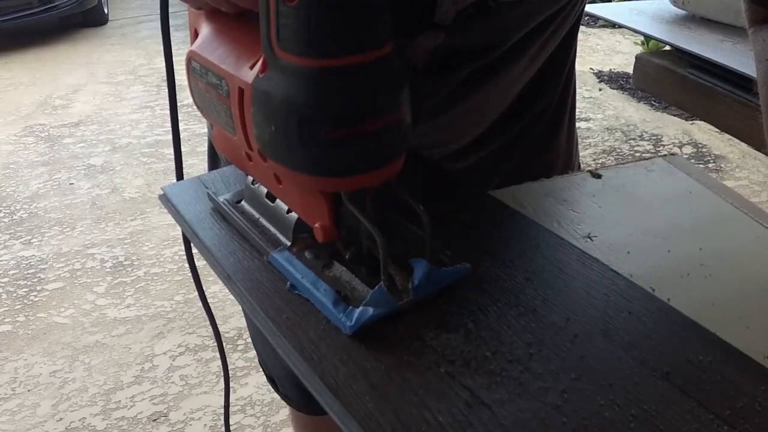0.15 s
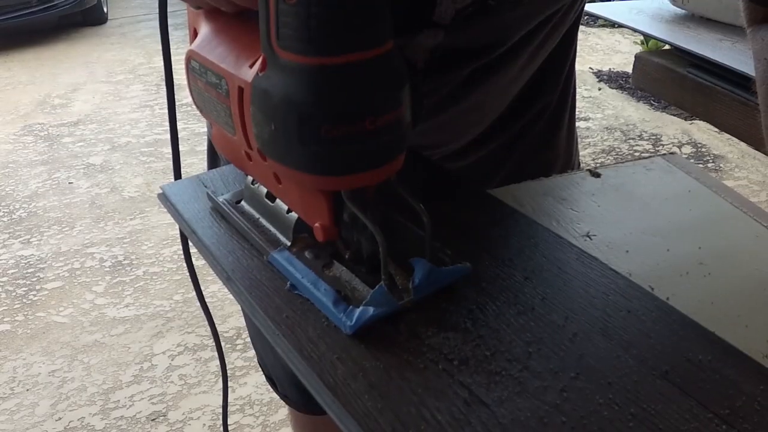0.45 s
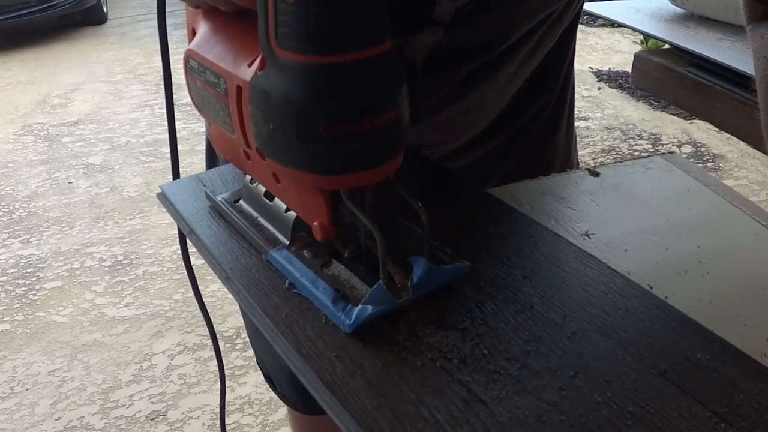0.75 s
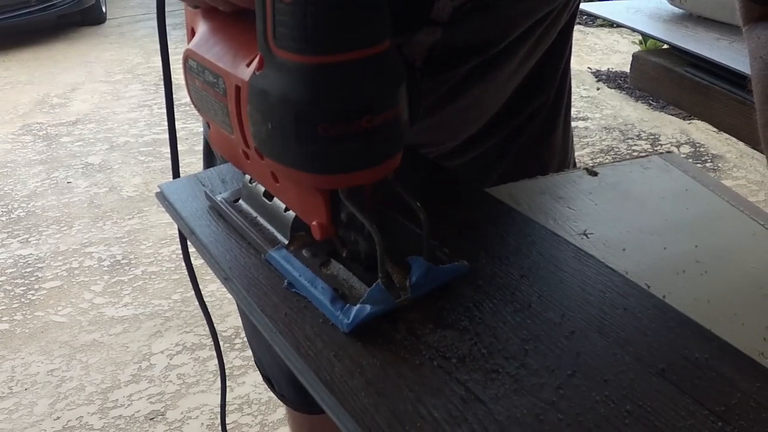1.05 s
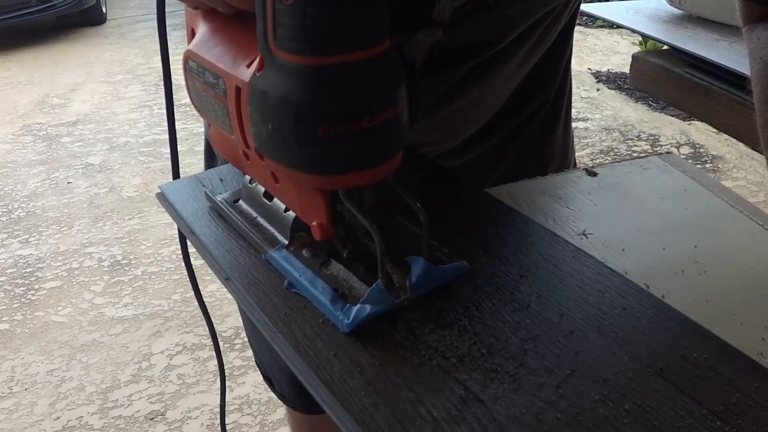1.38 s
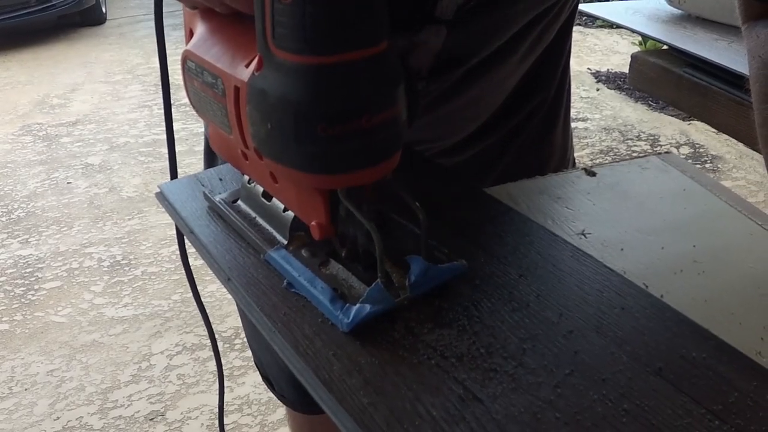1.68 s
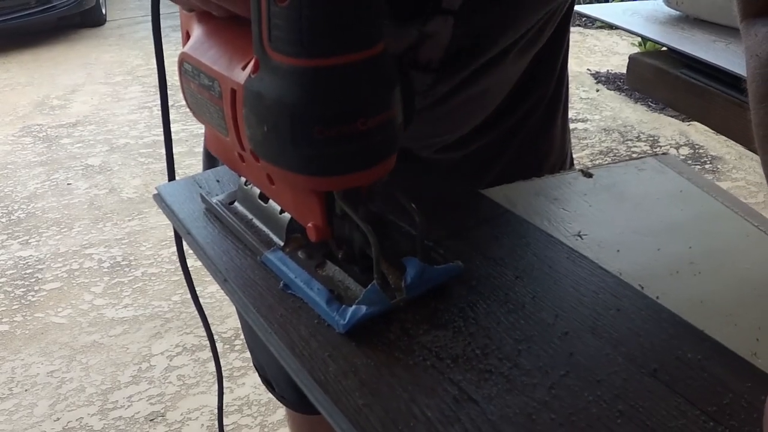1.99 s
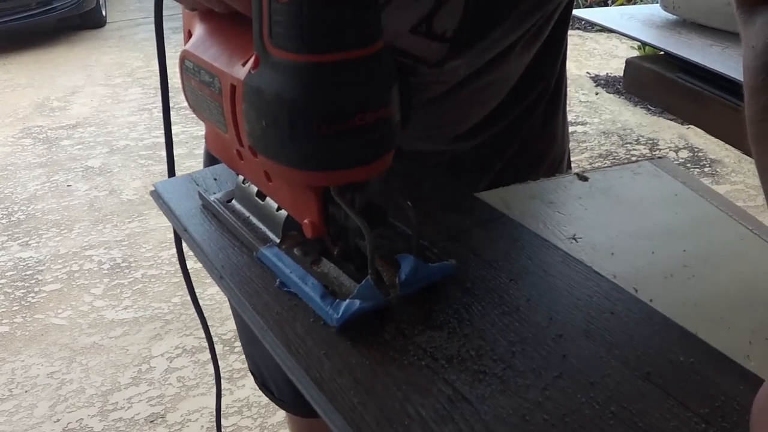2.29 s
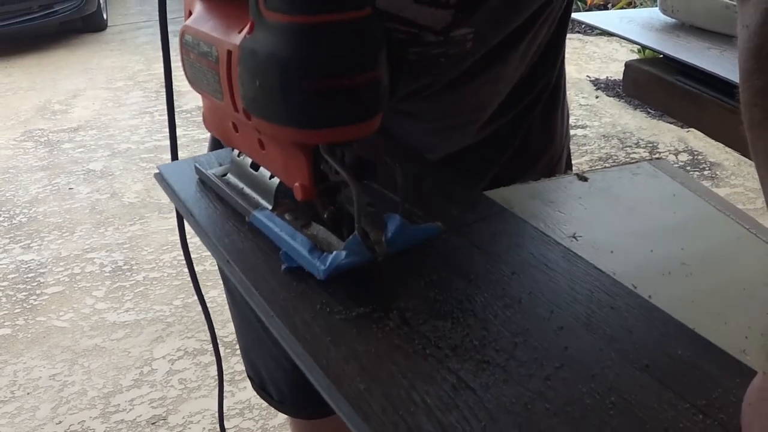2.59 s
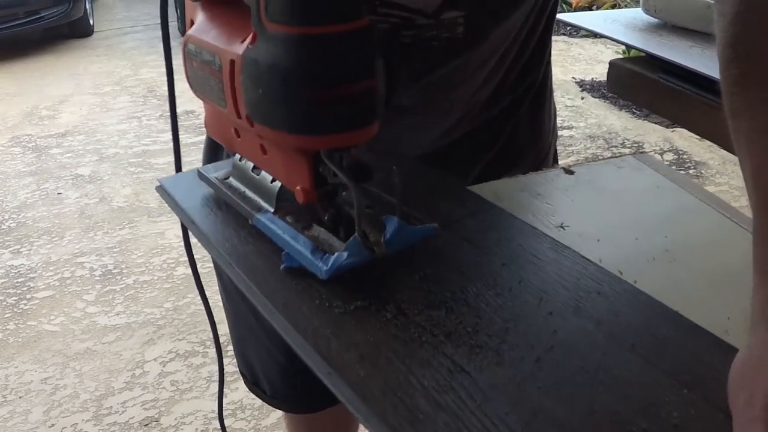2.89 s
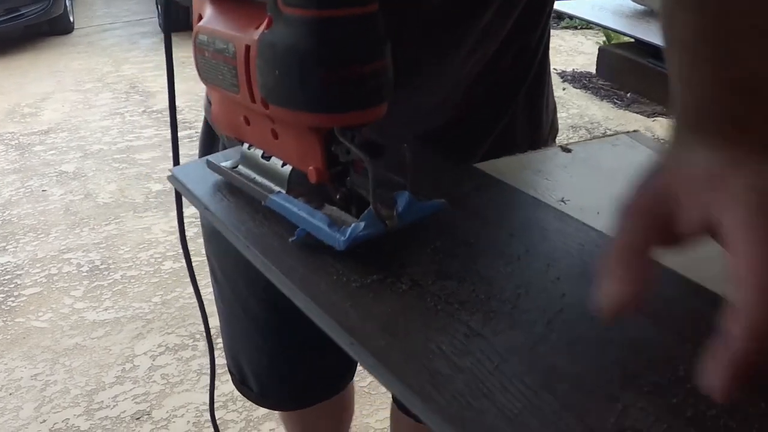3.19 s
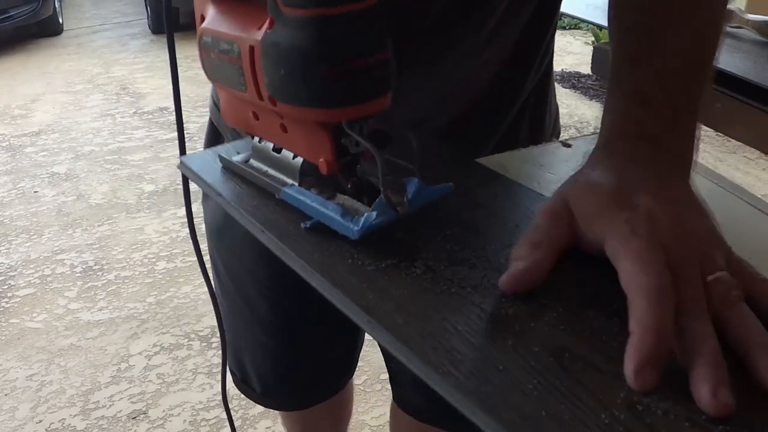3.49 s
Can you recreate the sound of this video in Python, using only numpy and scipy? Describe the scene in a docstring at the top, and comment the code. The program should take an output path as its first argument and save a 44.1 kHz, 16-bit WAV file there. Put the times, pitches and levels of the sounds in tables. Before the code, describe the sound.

Jigsaw buzzing and rattling in a plank slows to rest, with a bump and metallic clink.

```python
"""Jigsaw cutting a vinyl plank

A corded jigsaw rattles through a plank at the mouth of a garage, is switched off and coasts to rest.
One crank speed times the stroke knocks, the gear teeth and the swell of the blade's rasp.
Filtered noise and short noise bursts make the rattle, scrape and bumps; sines make the whine and hums.
The saw bumps the plank, clinks as it is lifted clear, and a hand comes down on the plank."""
import sys
import numpy as np
from scipy import signal
from scipy.fft import rfft, irfft, next_fast_len
from scipy.io import wavfile
from scipy.ndimage import uniform_filter1d, map_coordinates

SR = 44100
rng = np.random.default_rng(int(sys.argv[2]) if len(sys.argv) > 2 else 0)


def transcribe(signal):
    """Save signal, clipped to [-1, 1], as a 16-bit WAV file at the path in sys.argv[1]."""
    frames = np.atleast_2d(signal).T
    limited = np.clip(frames, -1, 1)
    pcm = np.round(limited * 32767).astype(np.int16)
    wavfile.write(sys.argv[1], SR, pcm)


N = 160965  # length in samples

# All dB values are relative levels; names ending in _T60 are seconds to fade by 60 dB.
# A turn is one full stroke of the crank. A swing in dB is the rise (or dip, if negative) in each stroke.

# Low wide rush, probably wind. Each row: time in seconds, level in dB.
BREEZE_LEVEL = [(0, -37), (.15, -38.5), (.45, -49), (.65, -56.5), (.8, -83), (.9, -130)]
# Its tone colour. Each row: frequency in Hz, level in dB.
BREEZE_COLOUR = [(20, -10.5), (60, -10.5), (110, -6), (200, 1), (320, 3), (460, -1.5), (600, -23),
                 (800, -63.5)]
# Deep rumble at the start. Each row: time in seconds, level in dB.
RUMBLE_LEVEL = [(0, -42.5), (.17, -51.5), (.27, -75), (.5, -91)]
# Its tone colour. Each row: frequency in Hz, level in dB.
RUMBLE_COLOUR = [(15, -5.5), (30, -4), (70, -0.5), (200, -27), (1000, -70)]
BREEZE_MID_DB = -1
# Colour of the steady background air. Each row: frequency in Hz, level in dB.
AIR_COLOUR = [(20, -18), (45, -15), (68, -1), (90, -4), (130, -6.5), (200, -8.5), (450, -11), (900, -14),
              (1500, -21), (2200, -27), (4000, -30), (5000, -38.5), (7000, -31.5), (15000, -35)]
AIR_DB = -60.5
# How long the garage rings. Each row: frequency in Hz, time to fade by 60 dB in seconds.
GARAGE_DECAY = [(100, 0.1), (1000, 0.37), (4500, 0.21), (12000, 0.67)]
GARAGE_DB = -10
TOP_HZ = 15200

# Taps of the saw's shoe on the plank. Each row: start in seconds, click level in dB,
# upper edge of the click in Hz, thump level in dB, sway level in dB.
TAPS = [(2.701, -23, 2620, -25, -54), (2.723, -41, 2000, -55, -37), (2.766, -39, 3000, -36.5, -43),
        (3.000, -48, 900, -46, -39.5), (3.014, -33.5, 2100, -41.5, -46), (3.043, -50, 3000, -55, -35.5),
        (3.175, -56, 4000, -68, -75), (3.2522, -47.5, 4000, -59.5, -65), (3.319, -63.5, 4000, -48, -67.5),
        (3.39, -60, 6000, -66, -71)]
CLICK_T60 = 0.054
THUMP_HZ, THUMP_T60, SWAY_HZ, SWAY_T60 = 259.5, 0.084, 86.3, 0.14
# Clinks of steel shoe and blade on lifting. Each row: start in seconds, level in dB.
CLINKS = [(3.023, -43), (3.031, -29), (3.034, -20.5), (3.0394, -27), (3.049, -35.5)]
# Tone colour of the steel. Each row: frequency in Hz, level in dB.
STEEL_COLOUR = [(300, -23), (1400, -11.5), (2300, -11.5), (3100, -9), (4000, -6), (4750, 1), (5600, -13.5),
                (7500, -22), (8800, -40), (10200, -23.5), (14000, -39.5)]
# Ringing of the steel. Each row: frequency in Hz, level in dB, time to fade by 60 dB in seconds.
STEEL_MODES = [(1530, 1, 0.13), (2970, -4, 0.14), (3530, -17, .18), (4270, -8, 0.27), (4570, -6, .16),
               (4786, -6, .22), (5000, -7, .13), (5400, -8, 0.18)]
CLINK_T60, CLINK_RING_DB, SPLASH_T60, SPLASH_DB = .02, -22, .13, -17.5
SHIMMER_DB, SHIMMER_HZ, SHIMMER_WIDTH_HZ, SHIMMER_T60 = -14, 4450, 330, 0.16
# Ringing under the hand. Each row: frequency in Hz, level in dB, time to fade by 60 dB in seconds.
PAT_MODES = [(440, 0, 0.12), (600, -2.5, .22), (690, 2.5, 0.074), (820, -5.5, 0.094)]
PAT_S, PAT_DB, PAT_SLAP_DB = 3.602, -42.5, -14  # start in seconds, levels
BURST_ATTACK_S, RING_ATTACK_S = 0.00063, 0.0014

# Shaking of the plank. Each row: time in seconds, level in dB.
SHAKE_LEVEL = [(0, -42), (.35, -38.5), (.75, -43), (1.5, -45), (2.15, -47), (2.4, -50.5), (2.7, -65),
               (2.83, -79.5)]
# Tone colour of the plank. Each row: frequency in Hz, level in dB.
PLANK_COLOUR = [(25, -34), (60, -17.5), (140, -5.5), (190, -14.5), (300, -7.5), (550, -2), (760, -5),
                (950, -4), (1600, -24.5), (5000, -58.5)]
# Resonances of the plank. Each row: frequency in Hz, width in Hz, lift in dB.
PLANK_MODES = [(132, 27, 3.8), (239.3, 24, 15.1), (323.8, 43, 13), (490.7, 24, 11.2), (766, 55, 4.8)]
SHAKE_SWING_DB, SHAKE_TURN, SHAKE_NOISE_DB = 6, .06, -0.5
THUD_TURN, THUD_DB = -0.0307, -2.5
# Bark of the plank while the teeth still bite deep. Each row: time in seconds, level in dB.
BITE_LEVEL = [(0, -35), (.3, -35.5), (.55, -38), (.75, -43.5), (1.6, -44), (2.2, -74.5)]
BITE_HZ, BITE_WIDTH_HZ, BITE_TURN, BITE_SWING_DB = 760, 225, 0.051, 5

# Short tones: low hums at first, then the falling gear tone and its overtone as the saw slows.
# Each row: start in seconds, end in seconds, pitch in Hz, level in dB.
SHORT_TONES = [(.06, .215, 322, -34), (.26, .33, 324, -38), (.44, .56, 326, -38), (.548, .578, 1070, -29),
               (.66, .708, 239, -34.5), (1.625, 1.69, 718, -38), (1.785, 1.835, 600, -38),
               (1.86, 1.9, 545, -42), (1.945, 1.998, 500, -33), (2.015, 2.068, 480, -35.5),
               (2.137, 2.18, 790, -33.5), (2.3, 2.502, 241.8, -52)]
TONE_WANDER = 0.45  # radians of phase

# Pings of the blade against its guide. Each row: start in seconds, level in dB, pitch in Hz.
PINGS = [(1.784, -29, 11200), (1.788, -42, 13850), (2.035, -25.5, 10860), (2.267, -33, 10900),
         (2.594, -55, 10370)]
PING_T60, PING_WIDTH_HZ = 0.052, 630
# Ticks of the blade in its guide, every stroke. Each row: seconds from the turning point, level in dB.
GUIDE_TICKS = [(-.007, -35.5), (.0055, -39), (.019, -37.5)]
GUIDE_HZ, GUIDE_WIDTH_HZ, GUIDE_T60, TICK_SCATTER_DB = 10900, 1100, .04, 1.8
# Snags of the teeth in the plank. Each row: start in seconds, level in dB.
SNAGS = [(.134, -14.5), (.553, -16.5), (.836, -20), (1.003, -18), (1.1135, -16), (1.286, -17.5),
         (1.523, -20), (1.646, -17.5), (1.784, -18), (1.861, -16), (1.944, -21.5), (2.056, -17.5),
         (2.143, -18.5), (2.169, -23.5), (2.269, -20.5), (2.276, -24.5), (2.434, -21.5)]
SNAG_T60, SNAG_LOW_HZ = .055, 900  # snags are thinned below this frequency

# Dry scrape of the coasting gears. Each row: time in seconds, level in dB.
COAST_LEVEL = [(1.5, -54), (1.9, -32.5), (2.15, -32), (2.3, -33), (2.45, -36), (2.53, -35.5), (2.68, -44.5),
               (2.76, -54), (2.82, -81.5)]
# Tone colour of the gears. Each row: frequency in Hz, level in dB.
GEARS_COLOUR = [(250, -39.5), (550, -21), (800, 0.5), (1050, -15.5), (1400, 3), (2200, 2), (3100, 2.5),
                (4500, -4), (5200, -5.5), (7400, -22), (8200, -44.5), (15000, -38)]
SCRAPE_PER_S, SCRAPE_SCATTER_DB, SCRAPE_FLUTTER_DB = 5000, 3, 1.5  # grains a second, unevenness
# Clicks of the slack as the drive runs down. Each row: start in seconds, level in dB.
SLACK_CLICKS = [(2.301, -25.5), (2.336, -22.5), (2.377, -25.5), (2.475, -30), (2.523, -36), (2.549, -29.5),
                (2.556, -30), (2.594, -32), (2.643, -37.5), (2.674, -31.5), (2.749, -46)]
SLACK_T60 = .035

# Gear whine. Each row: time in seconds, level in dB.
WHINE_LEVEL = [(0, -27.5), (.25, -26.5), (.7, -28), (1.1, -27), (1.5, -29), (1.72, -36), (1.8, -38.5),
               (1.87, -41), (1.96, -37), (2.05, -39), (2.15, -42.5), (2.7, -68)]
# Swell of the whine through one stroke. Each row: position in turns, level in dB.
WHINE_BEAD = [(-.4, -20), (-.25, -11), (-.16, -18), (-.05, 0), (.08, -1), (.22, -4), (.36, -17)]
WHINE_WANDER, WHINE_FLUTTER_DB = .6, 1.5  # radians of phase, unevenness
SPEED_RIPPLE, RIPPLE_TURN = 0.023, 0.067  # share by which whine pitch sways each stroke, and its place
GEAR_TEETH = 46

# Crank speed. Each row: time in seconds, strokes per second.
SPEED = [(0.0, 19.23), (0.6, 18.07), (1.1, 17.81), (1.55, 16.7), (1.85, 12.71), (2.2, 7.99), (2.5, 4.91),
         (2.8, 0.0)]
START_TURN = -.551
# Vigour of the mechanism. Each row: time in seconds, level in dB.
DRIVE_LEVEL = [(0, -1.8), (.45, -1.67), (1.1, -2.5), (1.65, -1.94), (1.9, -4), (2.15, -7), (2.35, -10.5),
               (2.55, -22), (2.7, -21), (2.76, -39), (2.82, -67)]
# Knocks of the slack drive, every stroke. Each row: seconds from the turning point, level in dB.
KNOCKS = [(-.0075, 0), (-.0035, -3.5), (.0055, -3), (0.0106, -7), (.024, -8)]
KNOCK_DB, KNOCK_T60, KNOCK_SCATTER_DB, KNOCK_JITTER_S = -28, 0.059, 1, .0009
KNOCK_SOFTEN_DB = 1  # lost per halving of the speed, below half the top speed
RATTLE_DB, RATTLE_SWING_DB, RATTLE_PER_S, RATTLE_SCATTER_DB = -30.5, 7.5, 1400, 4
TEETH_DB, TOOTH_JITTER, TOOTH_SCATTER_DB = -31, .17, 4  # jitter is in tooth spacings
RASP_DB, RASP_SWING_DB = -29.5, -6
LOAD_TURN, LOAD_WIDTH = 0.017, 0.28  # centre and spread of the loaded part of the stroke, in turns
# Tone colour of the saw's case. Each row: frequency in Hz, level in dB.
CASE_COLOUR = [(100, -47), (400, -13.5), (600, -2.5), (1050, -8.5), (1500, -3.5), (2200, 1), (2700, -1),
               (3600, -1.5), (4550, -3), (5100, -5.5), (6300, -10), (7500, -18), (8800, -27),
               (10800, -18.5), (12500, -35.5), (15000, -52)]
# Resonances of the case. Each row: frequency in Hz, width in Hz, lift in dB.
CASE_MODES = [(842, 78, -1.5), (1228, 35, 6), (1438, 190, 4), (1700, 60, 1.5), (1932, 39, 5.5),
              (2110, 220, 2.5), (2262, 160, 4.5), (2345, 59, -2.5), (2863, 100, 3), (3190, 70, -1),
              (3278, 140, 5.5), (3950, 200, 4.5), (4286, 280, 4.5), (4590, 80, 6.5)]
# Tone colour of the rasping blade. Each row: frequency in Hz, level in dB.
BLADE_COLOUR = [(200, -29.5), (700, -6), (2000, -5), (4300, 5), (5200, -2.5), (7400, -11.5), (8600, -21.5),
                (10900, -13.5), (12500, -39), (15000, -64)]


def amp(db):
    """Turn decibels into a gain."""
    return 10 ** (np.asarray(db) / 20)


def unit(x):
    """Scale to an rms level of 1."""
    return x / np.sqrt(np.mean(x ** 2) + 1e-20)


def along(points, hz):
    """Read values between (Hz, value) points on a log frequency axis."""
    f, v = np.transpose(points)
    return np.interp(np.log(hz + 1), np.log(f + 1), v)


def curve(rows):
    """Join (seconds, value) points by straight lines, one value per sample."""
    return np.interp(np.arange(N) / SR, *np.transpose(rows))


def wobble(rate):
    """A smooth random curve with rate new values a second."""
    knots = rng.standard_normal(int(N * rate / SR) + 4)
    return map_coordinates(knots, [np.arange(N) * rate / SR])


def colour(x, points, modes=()):
    """Filter of unit energy: a broad spectrum lifted by resonances, with no sound before its cause."""
    m = 2 * next_fast_len(len(x) // 2 + 4096)
    hz = np.fft.rfftfreq(m, 1 / SR)
    lift = sum(db / (1 + (2 * (hz - f) / w) ** 2) for f, w, db in modes)
    gain = unit(amp(along(points, hz) + lift))
    # Folding the log spectrum forward in time gives the filter its causal (minimum) phase.
    fold = irfft(np.log(np.maximum(gain, 1e-6)))
    fold[1:m // 2] *= 2
    fold[m // 2 + 1:] = 0
    return irfft(rfft(x, m) * np.exp(rfft(fold)), m)[:len(x)]


def fade(t60):
    """Half a second of exponential decay."""
    return amp(-60 * np.arange(SR // 2) / SR / t60)


def burst(t60):
    """Noisy chatter of a contact, building quickly and dying away."""
    attack = 1 - np.exp(-np.arange(SR // 2) / SR / BURST_ATTACK_S)
    return rng.standard_normal(SR // 2) * fade(t60) * attack


def ring(modes):
    """Damped sines from (Hz, dB, t60) rows, softly struck."""
    t = np.arange(SR // 2) / SR
    attack = 1 - np.exp(-t / RING_ATTACK_S)
    return attack * sum(amp(db) * fade(t60) * np.sin(2 * np.pi * hz * t) for hz, db, t60 in modes)


def band(hz, width):
    """Spectrum points of one lopsided band around hz, steeper above than below."""
    shape = [(-10, -45), (-3.5, -27.5), (0.0, 0), (-0.5, 5.0), (2.0, -20.0), (2.5, -49)]  # (widths, dB)
    return [(hz * np.exp(n * width / hz), db) for n, db in shape]


def add(out, s, sound):
    """Mix a sound in at time s."""
    part = out[max(round(s * SR), 0):][:len(sound)]
    part += sound[:len(part)]


def pulses(times, scatter_db):
    """Single-sample impacts of uneven size, scaled to rms 1."""
    size = amp(scatter_db * np.clip(rng.standard_normal(len(times)), -2, 2))
    return unit(np.bincount(np.clip(times * SR, 0, N - 1).astype(int), size, N))


def load(turn, centre, swing_db):
    """Gain that swells, or dips for a negative swing, once a stroke."""
    away = (turn - centre + .5) % 1 - .5
    return amp(swing_db * (np.exp(-.5 * (away / LOAD_WIDTH) ** 2) - .5))


def when(turn, marks):
    """Times at which the crank passes the given turns."""
    return np.interp(marks[(marks > turn[0]) & (marks < turn[-1])], turn, np.arange(N) / SR)


def stroke_hits(turn, rows, scatter_db, t60):
    """Repeat a pattern of (seconds, dB) contacts at every stroke, uneven in time and size."""
    hits = np.zeros(N)
    strokes = np.arange(int(turn[-1]) + 1)
    for lag, db in rows:
        for s in when(turn, strokes):
            start = s + lag + KNOCK_JITTER_S * rng.standard_normal()
            add(hits, start, amp(db + scatter_db * rng.standard_normal()) * burst(t60))
    return hits


def shaped(x, gain):
    """Multiply the spectrum of x by a gain that depends on frequency."""
    m = next_fast_len(N + SR // 2)
    return irfft(rfft(x, m) * gain(np.fft.rfftfreq(m, 1 / SR)), m)[..., :N]


def background_air():
    """Faint steady noise of the place."""
    return amp(AIR_DB) * colour(rng.standard_normal(N), AIR_COLOUR)


def breeze():
    """Low noise that differs from left to right, over a shared rumble."""
    mid, side = [amp(curve(BREEZE_LEVEL)) * colour(rng.standard_normal(N), BREEZE_COLOUR) for _ in range(2)]
    rumble = amp(curve(RUMBLE_LEVEL)) * colour(rng.standard_normal(N), RUMBLE_COLOUR)
    mid = amp(BREEZE_MID_DB) * mid + rumble
    return np.array([mid + side, mid - side])


def garage(x):
    """A diffuse noise tail in which each frequency dies at its own speed."""
    hz, t, z = signal.stft(rng.standard_normal(SR // 2), SR, nperseg=256)
    decay = amp(-60 * t / along(GARAGE_DECAY, hz)[:, None])
    tail = signal.istft(z * decay, SR, nperseg=256)[1]
    delayed = np.pad(x, (300, 0))  # the tail starts 300 samples late
    return amp(GARAGE_DB) * signal.fftconvolve(delayed, tail / np.linalg.norm(tail))[:N]


def shoe_taps():
    """The saw's shoe taps the plank: a case click, a thump and a low sway."""
    out = np.zeros(N)
    for s, click_db, edge_hz, thump_db, sway_db in TAPS:
        click = signal.lfilter(*signal.butter(2, edge_hz, fs=SR), burst(CLICK_T60))
        add(out, s, amp(click_db) * colour(click, CASE_COLOUR, CASE_MODES))
        thump_noise = colour(burst(THUMP_T60), PLANK_COLOUR, PLANK_MODES)
        thump = ring([(THUMP_HZ, 0, THUMP_T60)]) + amp(-15.0) * thump_noise
        add(out, s, amp(thump_db) * thump + ring([(SWAY_HZ, sway_db, SWAY_T60)]))
    return out


def steel_clinks():
    """Shoe and blade clink: a short burst, a longer splash, a shimmer and ringing steel."""
    out = np.zeros(N)
    for s, db in CLINKS:
        strike = colour(burst(CLINK_T60) + amp(SPLASH_DB) * burst(SPLASH_T60), STEEL_COLOUR)
        shimmer = amp(SHIMMER_DB) * colour(burst(SHIMMER_T60), band(SHIMMER_HZ, SHIMMER_WIDTH_HZ))
        add(out, s, amp(db) * (strike + shimmer + amp(CLINK_RING_DB) * ring(STEEL_MODES)))
    return out


def hand_pat():
    """A hand lands on the plank: damped tones and a soft noisy slap."""
    out = np.zeros(N)
    slap = amp(PAT_SLAP_DB) * colour(burst(CLICK_T60), CASE_COLOUR)
    add(out, PAT_S, amp(PAT_DB) * (ring(PAT_MODES) + slap))
    return out


def plank(turn):
    """Every stroke thuds and shakes the plank's low resonances."""
    thuds = pulses(when(turn, np.arange(int(turn[-1]) + 1) + THUD_TURN), scatter_db=2.0)
    shudder = rng.standard_normal(N) * load(turn, SHAKE_TURN, SHAKE_SWING_DB)
    shake = amp(THUD_DB) * thuds + amp(SHAKE_NOISE_DB) * shudder
    return colour(shake * amp(curve(SHAKE_LEVEL)), PLANK_COLOUR, PLANK_MODES)


def bite(turn):
    """A hollow bark from the plank, one band of noise swelling on each cutting stroke."""
    push = rng.standard_normal(N) * load(turn, BITE_TURN, BITE_SWING_DB) * amp(curve(BITE_LEVEL))
    return colour(push, band(BITE_HZ, BITE_WIDTH_HZ))


def short_tones():
    """Short swells of single wandering tones, low hums first, then the gear tone sinking."""
    t = np.arange(N) / SR
    out = np.zeros(N)
    for start, end, hz, db in SHORT_TONES:
        progress = np.clip((t - start) / (end - start), 0, 1)
        swell = np.sqrt(np.abs(np.sin(np.pi * progress)))
        out += amp(db) * swell * np.sin(2 * np.pi * hz * t + TONE_WANDER * wobble(rate=32))
    return out


def blade_pings():
    """The blade pings against its guide: short bursts in a narrow high band."""
    out = np.zeros(N)
    for s, db, hz in PINGS:
        add(out, s, amp(db) * colour(burst(PING_T60), band(hz, PING_WIDTH_HZ)))
    return out


def blade(turn):
    """The blade ticks in its guide at every stroke, and now and then its teeth snag."""
    ticks = stroke_hits(turn, GUIDE_TICKS, TICK_SCATTER_DB, GUIDE_T60) * amp(curve(DRIVE_LEVEL))
    snags = np.zeros(N)
    for s, db in SNAGS:
        add(snags, s, amp(db) * burst(SNAG_T60))
    snags = signal.lfilter(*signal.butter(1, SNAG_LOW_HZ, 'high', fs=SR), snags)
    return colour(ticks, band(GUIDE_HZ, GUIDE_WIDTH_HZ)) + colour(snags, CASE_COLOUR, CASE_MODES)


def coasting(turn):
    """With the power off the unloaded gears scrape in fine grains and click in their slack."""
    grains = pulses(rng.uniform(0, N / SR, int(SCRAPE_PER_S * N / SR)), SCRAPE_SCATTER_DB)
    grains = unit(grains - uniform_filter1d(grains, size=61))  # take out the slow drift
    level = amp(curve(COAST_LEVEL) + SCRAPE_FLUTTER_DB * wobble(rate=130))
    scrape = colour(grains, GEARS_COLOUR, CASE_MODES) * level
    clicks = np.zeros(N)
    for s, db in SLACK_CLICKS:
        add(clicks, s, amp(db) * burst(SLACK_T60))
    return scrape * load(turn, LOAD_TURN, swing_db=7) + colour(clicks, CASE_COLOUR, CASE_MODES)


def gear_whine(turn):
    """The tooth tone sounds as one bead on each stroke, and sinks with the speed."""
    uneven = turn + SPEED_RIPPLE / (2 * np.pi) * np.cos(2 * np.pi * (turn - RIPPLE_TURN))
    tone = np.sin(2 * np.pi * GEAR_TEETH * uneven + WHINE_WANDER * wobble(rate=70))
    bead_db = np.interp(turn, *np.transpose(WHINE_BEAD), period=1)
    return tone * amp(curve(WHINE_LEVEL) + bead_db + WHINE_FLUTTER_DB * wobble(rate=94))


def mechanism(turn):
    """Stroke knocks, meshing teeth and loose rattle ring the case; the blade rasps."""
    knocks = stroke_hits(turn, KNOCKS, KNOCK_SCATTER_DB, KNOCK_T60)
    mesh = np.arange(int(turn[0] * GEAR_TEETH), int(turn[-1] * GEAR_TEETH))
    tooth_turns = (mesh + TOOTH_JITTER * rng.standard_normal(len(mesh))) / GEAR_TEETH
    teeth = pulses(when(turn, tooth_turns), TOOTH_SCATTER_DB)
    rattle = pulses(rng.uniform(0, N / SR, int(RATTLE_PER_S * N / SR)), RATTLE_SCATTER_DB)
    clatter = amp(TEETH_DB) * teeth + amp(RATTLE_DB) * rattle
    clatter = clatter * load(turn, LOAD_TURN, RATTLE_SWING_DB)
    clatter = clatter - uniform_filter1d(clatter, size=301)  # take out the slow drift
    speed = curve(SPEED)
    soften_db = KNOCK_SOFTEN_DB * np.log2(np.clip(2 * speed / speed.max(), 1 / 10, 1))
    blows = amp(KNOCK_DB + soften_db) * unit(knocks) + clatter
    rasp = colour(rng.standard_normal(N), BLADE_COLOUR, CASE_MODES) * load(turn, LOAD_TURN, RASP_SWING_DB)
    return amp(curve(DRIVE_LEVEL)) * (colour(blows, CASE_COLOUR, CASE_MODES) + amp(RASP_DB) * rasp)


def scene():
    """Saw, plank and garage in the middle; only the breeze is wide."""
    turn = START_TURN + np.cumsum(curve(SPEED)) / SR  # crank position in turns
    handling = shoe_taps() + steel_clinks() + hand_pat()
    cutting = plank(turn) + bite(turn) + short_tones()
    saw = blade_pings() + blade(turn) + coasting(turn) + gear_whine(turn) + mechanism(turn)
    close = handling + cutting + saw
    return background_air() + breeze() + garage(close) + close


def record(dry):
    """Remove everything from the top frequency limit upward."""
    return shaped(dry, lambda hz: hz < TOP_HZ)


dry = scene()
out = record(dry)
transcribe(out)
```